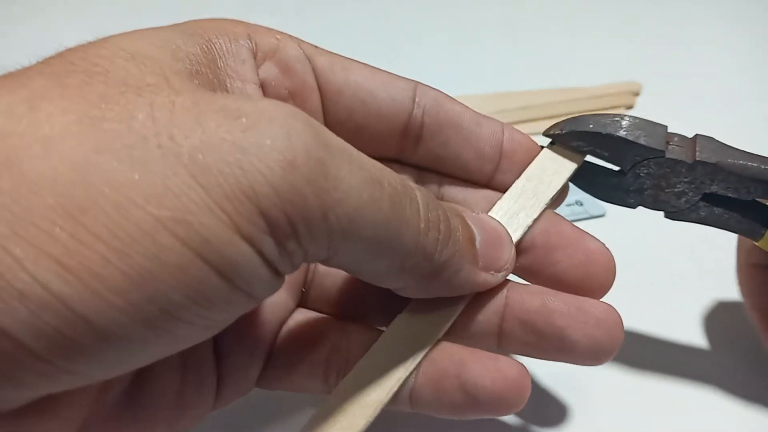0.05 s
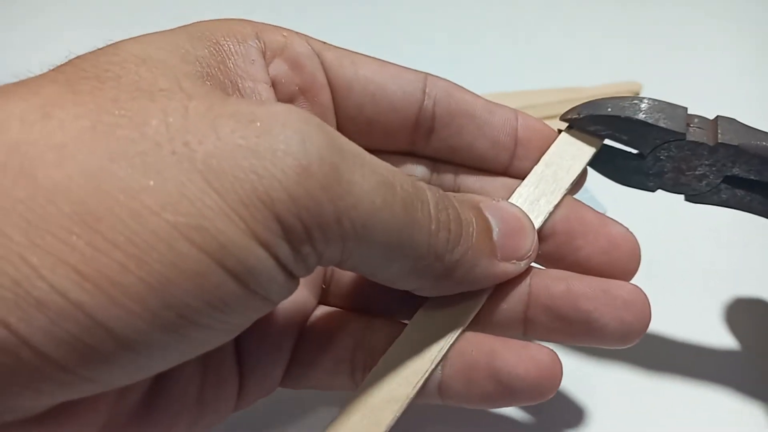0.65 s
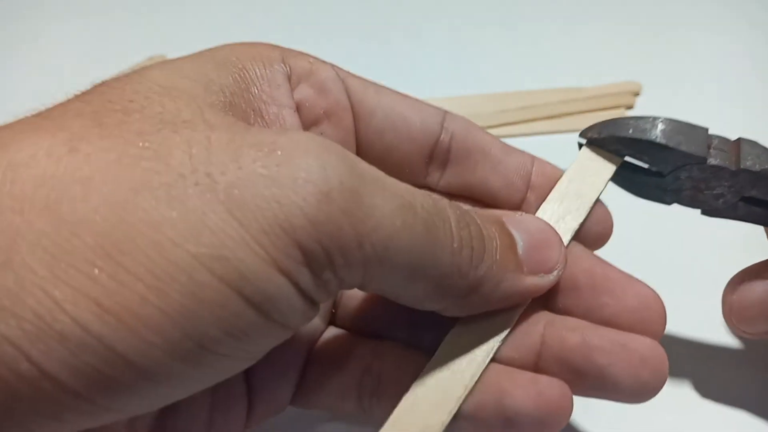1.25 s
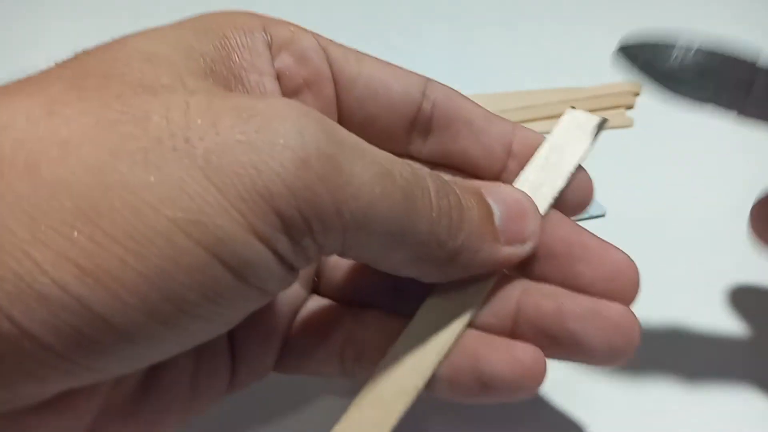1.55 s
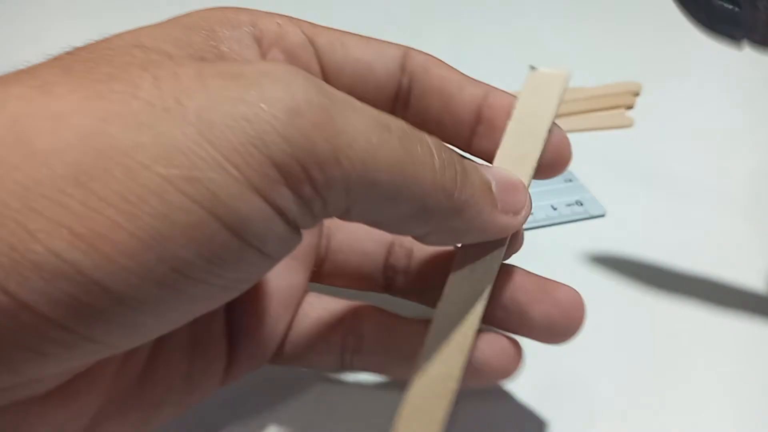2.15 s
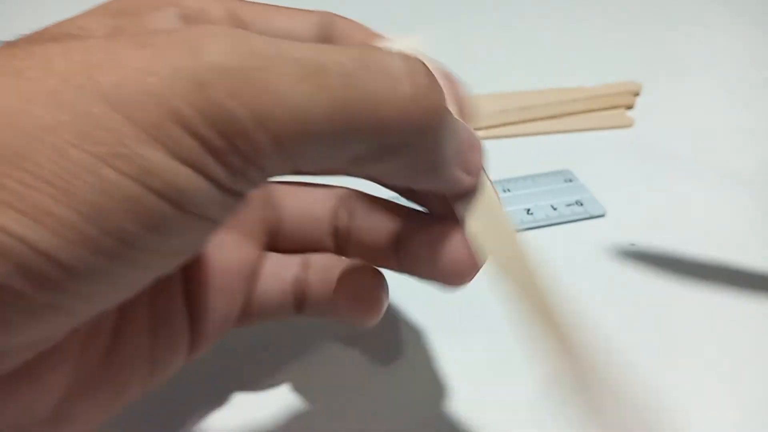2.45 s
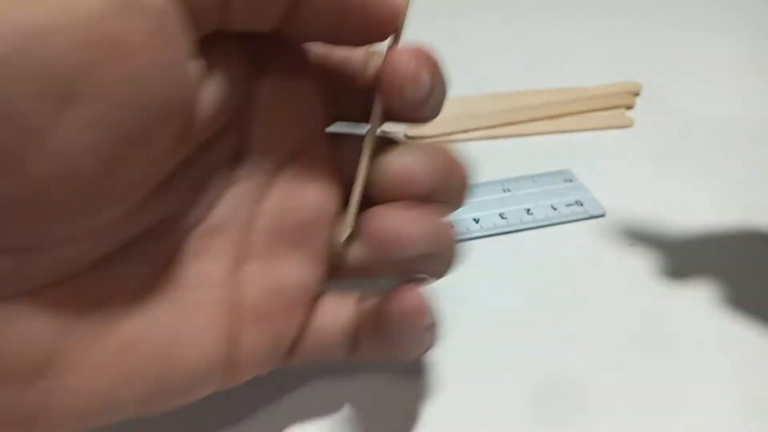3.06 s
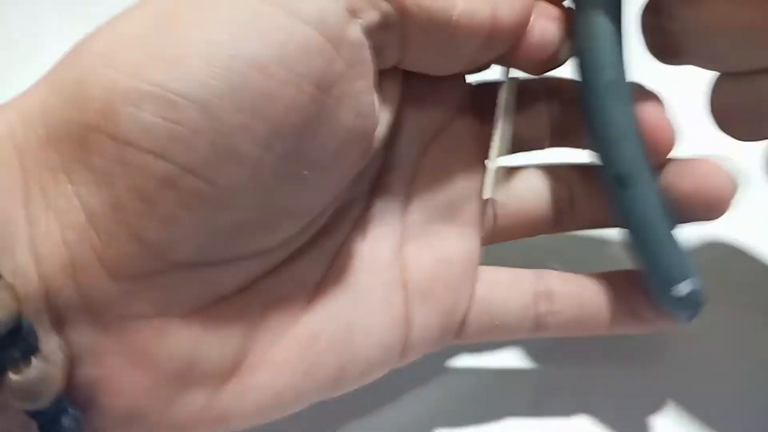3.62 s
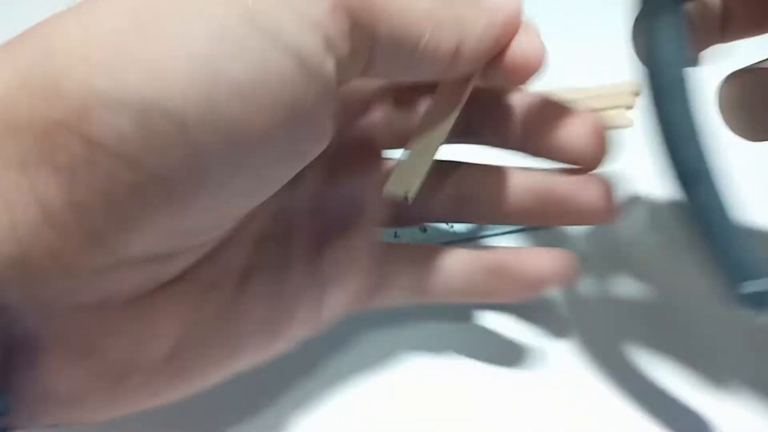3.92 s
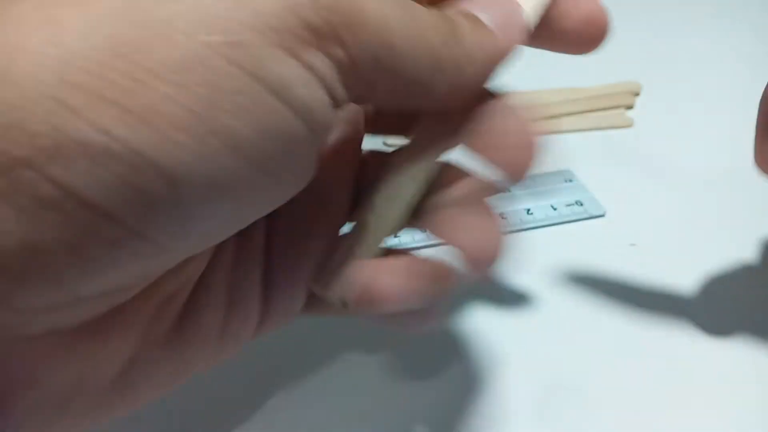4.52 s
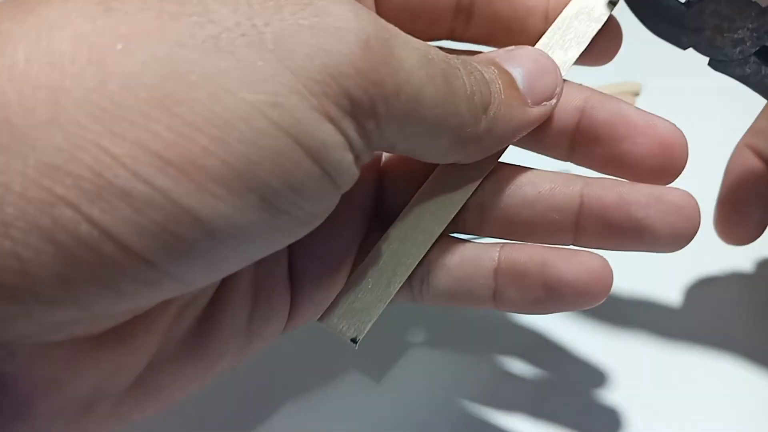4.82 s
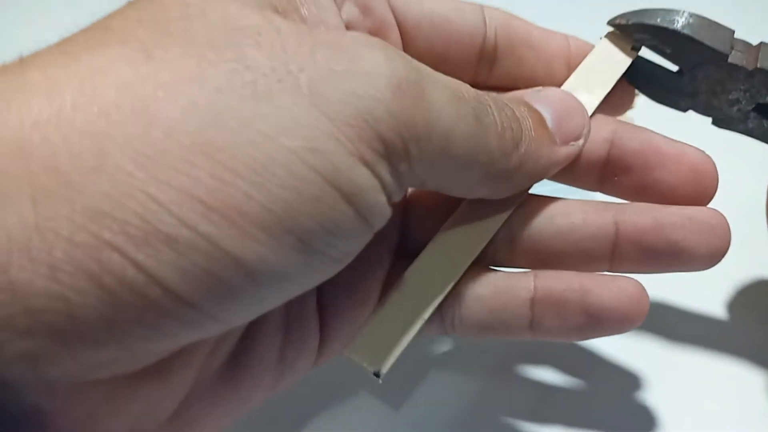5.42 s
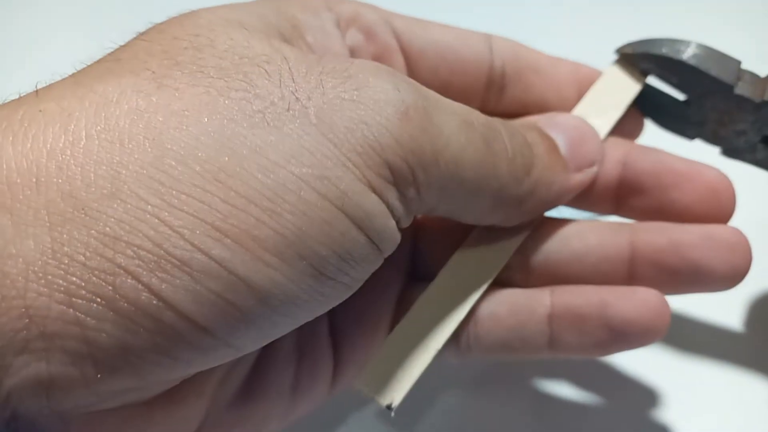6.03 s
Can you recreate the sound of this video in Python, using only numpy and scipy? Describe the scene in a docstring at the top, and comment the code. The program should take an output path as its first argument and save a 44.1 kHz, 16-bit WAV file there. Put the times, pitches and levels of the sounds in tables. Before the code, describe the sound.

Cutting pliers snip a wooden stick with one loud, sharp crack in a ringing room, followed by light clicks, while a distant dog yaps faintly.

```python
"""Cutting pliers bite through a wooden craft stick, close by, in a bare, ringing room.
An earlier crack's echo dies away; fibres crackle under the blades. At 1.19 s the wood cracks, the jaws
ring and a limiter ducks; the offcut bounces across the room until 2 s. From 2.5 s fingers turn the stick
and it ticks; the pliers knock at 3.44 s, then their joint squeaks.
Throughout: skin rubbing, a small dog yapping far away, room rumble and hiss."""
import sys
import numpy as np
from scipy import signal
from scipy.fft import rfft, irfft, next_fast_len
from scipy.io import wavfile
from scipy.ndimage import uniform_filter1d, minimum_filter1d, map_coordinates

SR = 44100
rng = np.random.default_rng(int(sys.argv[2]) if len(sys.argv) > 2 else 0)


def inscribe(sig):
    """Save sig as 16-bit PCM at rate SR to the path in sys.argv[1].

    A 1-D sig is mono; a 2-D sig holds one channel per row.
    Samples are clipped to [-1, 1] before scaling.
    """
    pcm = np.round(np.clip(np.atleast_2d(sig).T, -1, 1) * 32767)
    wavfile.write(sys.argv[1], SR, pcm.astype(np.int16))


N = 276948
T = np.arange(SR) / SR  # time axis of one event, 1 s
TOP_HZ = 15900

# snap of dry wood: (frequency [Hz], gain [dB])
SNAP_SPECTRUM = [(300, -1), (2400, 0.5), (3300, -7.5), (5000, 6.5), (8000, -5), (10000, -1), (12500, -8.5),
                 (15500, -4.5)]


def cut(room_db=-0.5):
    """Fibres tear within milliseconds; the steel jaws ring as they meet."""
    # (time [s], level [dB], tearing time [s]); the first leaves only its tail
    cracks = [(-.45, -6, 0.011), (1.1877, 2.3, 0.0036)]
    # breaking wood: (frequency [Hz], gain [dB])
    wood_spectrum = [(410, -51), (700, -16.5), (968, -21), (1240, -13.5), (1600, -4.5), (1900, -10),
                     (2160, -5.5), (3110, -21.5), (4130, -3), (5360, -11.5), (6500, -0.5), (8000, -16),
                     (9980, -14), (13100, -31.5), (15500, -18.5)]
    # (frequency [Hz], level [dB], t60 [s])
    jaw_modes = [(2110, -34.5, 0.049), (4040, -35.5, .12), (4270, -30.5, .12), (4250, -34.5, 0.19),
                 (5620, -35.5, .1), (5982, -35.5, .1), (6250, -36.5, .1), (6715, -32.5, .16)]
    ring = sum(amp(db) * fade(t60_s) * np.sin(2 * np.pi * hz * T) for hz, db, t60_s in jaw_modes)
    out = np.zeros((2, N))
    for s, db, tearing_s in cracks:
        crack = burst(swell(T, tearing_s), lambda hz: amp(along(wood_spectrum, hz)))
        add(out, s, amp(db) * in_room(crack + ring, room_db))
    return out


def offcut(t60_s=0.022, room_scale=0.96):
    """The chip lands far off, so its bright clacks are mostly room."""
    # (time [s], level [dB], room re direct [dB])
    bounces = [(-.25, -19, 10), (1.3135, -10, 2.5), (1.3251, -16.5, 10.5), (1.3355, -18.5, 11),
               (1.9004, -65, 15.5), (1.9905, -42.5, 11.5)]
    # (frequency [Hz], gain [dB])
    chip_spectrum = [(300, -23), (1500, -10), (2400, -7), (3200, -14.5), (4500, -9), (6000, 2), (8000, -11),
                     (9800, -2), (12000, -14), (15000, -7)]
    out = np.zeros((2, N))
    for s, db, room_db in bounces:
        clack = burst(fade(t60_s), lambda hz: amp(along(chip_spectrum, hz)))
        add(out, s, amp(db) * in_room(clack, room_db, room_scale))
    return out


def knock(t60_s=0.014, room_db=-13.5, room_scale=0.66):
    """The pliers knock in the hand: each contact is a dry snap plus the ring of the steel."""
    # touch, blow, two rebounds: (time [s], level [dB], snap [dB])
    contacts = [(3.4403, -27.5, -19), (3.4418, -14.5, -44), (3.4473, -33, -3), (3.4521, -33.5, -6)]
    # (frequency [Hz], width [Hz], gain [dB])
    steel_modes = [(2520, 160, -22), (3830, 360, -0.5), (5850, 700, -18), (9750, 450, -23.5),
                   (15300, 900, -38)]
    steel = lambda hz: sum(amp(db) * resonance(hz, centre, width) for centre, width, db in steel_modes)
    out = np.zeros((2, N))
    for s, db, snap_db in contacts:
        clack = burst(fade(t60_s), lambda hz: steel(hz) + amp(snap_db + along(SNAP_SPECTRUM, hz)))
        add(out, s, amp(db) * in_room(clack, room_db, room_scale))
    return out


def thumps(cut_s=1.1878, knock_s=3.4436, room_scale=0.93):
    """The cut jolts the stick, the knock the handles; each flexes for a few damped cycles."""
    # both: (frequency [Hz], level [dB], t60 [s], left-right [dB])
    stick_modes = [(1610, 2, .005, 17), (450.2, -9, .005, 2), (237.9, -12, .022, 3.5)]
    handle_modes = [(1210, -39, .022, 2.5), (535, -40.5, 0.041, 4.8), (80, -28.5, .08, 4.2),
                    (138, -30, .065, 1.9)]
    out = np.zeros((2, N))
    for s, modes, room_db in (cut_s, stick_modes, -10.5), (knock_s, handle_modes, -19.5):
        for hz, db, t60_s, pan_db in modes:
            phase = 2 * np.pi * hz * T
            flex = np.sin(phase) * fade(t60_s) * (1 - np.exp(-phase))
            velocity = np.gradient(flex, phase)  # pushes the air
            near = amp([[pan_db / 2], [-pan_db / 2]]) * direct(velocity)
            add(out, s, amp(db) * (near + amp(room_db) * reverb(velocity, room_scale)))
    return out


def stick_gain(hz, ring_hz, snap_db, width_ratio=0.15, overtone_ratio=2.1, overtone_db=-18):
    """A broad snap plus a ring and its overtone, pitched by where the fingers damp the stick."""
    ring = lambda f: resonance(f, ring_hz, width_ratio * ring_hz)
    snap = amp(snap_db + along(SNAP_SPECTRUM, hz))
    return ring(hz) + amp(overtone_db) * ring(hz / overtone_ratio) + snap


def ticks(t60_s=0.007, room_db=-11, room_scale=0.45):
    """Brief contacts with fingers and pliers set the stick ringing."""
    # (time [s], level [dB], ring [Hz], snap [dB])
    contacts = [(2.5568, -32.5, 4940, 1), (2.9284, -45.5, 4850, -34), (3.1827, -34.5, 5100, -28),
                (3.811, -47, 2770, -20.5), (4.6707, -40.5, 4700, -2), (4.7329, -42.5, 4660, -13)]
    out = np.zeros((2, N))
    for s, db, ring_hz, snap_db in contacts:
        tick = burst(fade(t60_s), lambda hz: stick_gain(hz, ring_hz, snap_db))
        add(out, s, amp(db) * in_room(tick, room_db, room_scale))
    return out


def squeaks(room_db=-15, room_scale=0.42, grit_db=-26, width_ratio=0.16, lead_s=0.2):
    """Dry contacts slip and sing, nearly pure: skin low on the wood, the pliers' joint high."""
    # (peak time [s], level [dB], pitch [Hz], half length [s])
    slips = [(.705, -44, 172.4, 0.059), (3.817, -63, 3586, 0.0089), (4.0732, -33, 5585, 0.0065),
             (5.208, -41, 5246, 0.0047)]
    out = np.zeros((2, N))
    for s, db, hz, half_s in slips:
        grit = unit_rms(filtered(rng.standard_normal(SR), lambda f: resonance(f, hz, width_ratio * hz)))
        tone = np.sin(2 * np.pi * hz * T) + amp(grit_db) * grit
        add(out, s - lead_s, amp(db) * in_room(swell(T - lead_s, half_s) * tone, room_db, room_scale))
    return out


def crush(t60_s=0.007, splinter_count=4, mean_gap_s=0.012, splinter_db=-13, room_db=-6, room_scale=0.6):
    """The blades sink in: each fibre that breaks takes a few more with it."""
    # (time [s], level [dB])
    breaks = [(.3545, -56), (.399, -53), (.4285, -48), (.741, -50), (.7475, -40.5), (.759, -47),
              (.803, -54), (.9284, -48.5), (.945, -50), (.9752, -54), (1.023, -55.5)]
    # (frequency [Hz], gain [dB])
    fibre_spectrum = [(1000, -16.5), (5000, -14), (7500, -13.5), (9500, -0.5), (12000, -8), (14000, -2.5),
                      (15500, 6.5)]
    out = np.zeros((2, N))
    for s, db in breaks:
        delays_s = np.cumsum(rng.exponential(mean_gap_s, size=splinter_count))
        splinters = sum(np.roll(fade(t60_s), round(delay * SR)) for delay in delays_s)
        envelope = fade(t60_s) + amp(splinter_db) * splinters
        crackle = burst(envelope, lambda hz: amp(along(fibre_spectrum, hz)) * (hz < TOP_HZ))
        add(out, s, amp(db) * in_room(crackle, room_db, room_scale))
    return out


def skin_friction(pitch_hz, peak_hz=167, diffuse_db=-6):
    """Dull noise of skin, its peak moved to pitch_hz; rms 1, largely alike on both sides."""
    # (frequency [Hz], gain [dB])
    skin_spectrum = [(24, -63.5), (40, -28.5), (167, -1.5), (200, -13), (291, -17.5), (501, -32.5),
                     (542, -40), (600, -36), (780, -67.5), (1320, -120)]
    noise = direct(rng.standard_normal(N)) + amp(diffuse_db) * rng.standard_normal((2, N))
    return unit_rms(filtered(noise, lambda hz: amp(along(skin_spectrum, hz * peak_hz / pitch_hz))))


def hands(gain_db=-1, hold_db=-73, hold_hz=167, sway_db=3, sways_per_s=6):
    """Skin shifts on stick and grips: swells of friction over a hold that is never quite still."""
    # (peak time [s], level before gain [dB], half length [s], pitch [Hz])
    rubs = [(.01, -51.5, .04, 165), (.05, -52, 0.045, 305), (.21, -59, 0.052, 160),
            (0.462, -49.5, 0.047, 160), (.72, -52.5, .07, 295), (.79, -54, 0.07, 155),
            (0.986, -56.5, 0.089, 165), (1.38, -46, .1, 255), (1.62, -50, 0.063, 165),
            (1.85, -62, .04, 165), (2.058, -62, 0.053, 260), (2.41, -54, .06, 160),
            (2.578, -53, 0.044, 160), (3.73, -60, .05, 160), (4.68, -57, .03, 335), (5.11, -64, .07, 165)]
    t = np.arange(N) / SR
    knots = rng.standard_normal(int(t[-1] * sways_per_s) + 2)
    sway = map_coordinates(knots, [t * sways_per_s], mode="nearest")
    hold = amp(hold_db + sway_db * sway) * skin_friction(hold_hz)
    shifts = sum(amp(db) * swell(t - s, half_s) * skin_friction(hz) for s, db, half_s, hz in rubs)
    return amp(gain_db) * (hold + shifts)


def slides(half_s=0.024, snap_db=-21, room_db=-6, room_scale=0.55, lead_s=0.1):
    """The stick slides through the fingers; friction excites its resonances."""
    # (peak time [s], level [dB], ring [Hz])
    strokes = [(.555, -70, 5700), (3.72, -63.5, 2900), (5.085, -69, 2510)]
    out = np.zeros((2, N))
    for s, db, ring_hz in strokes:
        scrape = unit_rms(filtered(rng.standard_normal(SR), lambda hz: stick_gain(hz, ring_hz, snap_db)))
        add(out, s - lead_s, amp(db) * in_room(scrape * swell(T - lead_s, half_s), room_db, room_scale))
    return out


def dog(jitter_ratio=0.055, third_db=-16, scoop_ratio=0.19, scoop_s=0.05, dulling_db=8):
    """Hoarse yaps scoop up to pitch and dull as the mouth closes; only their reverberation arrives."""
    # (time [s], target pitch [Hz], level [dB], length [s], octave [dB])
    yaps = [(.16, 815, -66, .11, -21), (1.008, 665, -58.5, 0.085, 0), (1.505, 672, -54.5, 0.083, -4),
            (1.876, 640, -54.5, .12, -4), (2.32, 650, -58, .16, -2.5), (3.29, 574.5, -70, .14, -14),
            (3.645, 700.4, -69.5, 0.13, 9), (4.175, 700, -68, .13, 5.5), (4.68, 776, -63.5, 0.063, 0)]
    out = np.zeros((2, N))
    for s, hz, db, length_s, octave_db in yaps:
        progress = np.clip(T / length_s, 0, 1)
        jitter = jitter_ratio * unit_rms(uniform_filter1d(rng.standard_normal(SR), size=130))
        pitch_hz = hz * (1 - scoop_ratio * np.exp(-T / scoop_s) + jitter)
        phase = 2 * np.pi * np.cumsum(pitch_hz) / SR
        mouth = amp(dulling_db * (0.5 - progress))
        overtones = amp(octave_db) * np.sin(2 * phase) + amp(third_db) * np.sin(3 * phase)
        voice = np.sin(phase) / mouth + mouth * overtones
        envelope = np.sqrt(np.abs(np.sin(np.pi * progress)))
        add(out, s, amp(db) * reverb(voice * envelope))
    return out


def air(rms_db=-63.5):
    """Steady room rumble and microphone hiss."""
    # (frequency [Hz], gain [dB])
    spectrum = [(15, -60.5), (25, -34), (70, -6.5), (92, -10), (123, 4.5), (190, -18.5), (301, -8),
                (363, -17), (575, -17), (677, -19.5), (818, -20.5), (1330, -23), (2760, -25), (13200, -44),
                (16000, -26)]
    # (frequency [Hz], left-right [dB])
    balance = [(60, 9.5), (110, 2.5), (200, -1), (380, 0), (700, 1.5), (1290, 2), (2380, 5), (4400, 4),
               (8120, -2.5), (15000, 6.5)]
    noise = rng.standard_normal((2, N))
    return amp(rms_db) * unit_rms(filtered(noise, lambda hz: amp(along(spectrum, hz)) * pan(balance, hz)))


def reverb(x, room_scale=1, build_s=0.016):
    """The diffuse room builds up, then dies treble first; room_scale multiplies its t60."""
    # (frequency [Hz], t60 [s])
    room_decay = [(150, 0.77), (1000, 0.73), (2000, 0.7), (4000, 0.71), (6500, 0.57), (9800, 0.39),
                  (12000, .34), (15000, .34)]
    hz, t, noise = signal.stft(rng.standard_normal((2, SR)), SR, nperseg=256)
    t60_s = room_scale * along(room_decay, hz)[:, None]
    tail = signal.istft(noise * np.exp(-np.log(1000) * t / t60_s), SR, nperseg=256)[1][:, :SR]
    tail *= 1 - np.exp(-T / build_s)
    return signal.fftconvolve(x[None], tail / np.linalg.norm(tail[1]), axes=1)[:, :SR]


def direct(x, lag_s=0.0011):
    """Sound reaches the right microphone first, then the left."""
    return np.array([np.roll(x, round(lag_s * SR)), x])


def in_room(x, room_db, room_scale=1):
    """Direct sound plus reverberation."""
    return direct(x) + amp(room_db) * reverb(x, room_scale)


def burst(envelope, gain, power_floor=0.067):
    """Tiny fractures ring through a body; the envelope sets their energy."""
    spectrum = rfft(envelope * rng.standard_normal(SR))
    power = np.abs(spectrum) ** 2
    whitening = 1 / np.sqrt(power / power.mean() + power_floor)  # sharp breaks are nearly flat
    y = irfft(spectrum * causal(whitening * gain(np.fft.rfftfreq(SR, 1 / SR))))
    return y * np.linalg.norm(envelope) / np.linalg.norm(y) / 2


def causal(gain):
    """Minimum-phase response: rings only after a blow."""
    cepstrum = irfft(np.log(np.maximum(gain, 1e-6)))
    half = cepstrum.shape[-1] // 2
    cepstrum[..., 1:half] *= 2
    cepstrum[..., half + 1:] = 0
    return np.exp(rfft(cepstrum))


def filtered(x, response):
    """x through response(hz)."""
    n = x.shape[-1]
    size = next_fast_len(n + SR // 4)
    return irfft(rfft(x, size) * response(np.fft.rfftfreq(size, 1 / SR)), size)[..., :n]


def resonance(hz, centre_hz, width_hz):
    """Gain of one steep-sided peak."""
    return 1 / (1 + ((hz - centre_hz) / width_hz) ** 2) ** 2


def pan(balance, hz):
    """Left and right gains, constant total power."""
    ratio = amp(along(balance, hz))
    return np.array([ratio, np.ones_like(ratio)]) / np.sqrt((1 + ratio ** 2) / 2)


def along(points, hz):
    """(Hz, value) points read on a log axis."""
    points_hz, values = np.transpose(points)
    return np.interp(np.log(hz + 1), np.log(points_hz + 1), values)


def fade(t60_s):
    """Exponential decay."""
    return np.exp(-np.log(1000) * T / t60_s)


def swell(t, half_s):
    """Gaussian envelope, peak at t = 0."""
    return np.exp(-(t / half_s) ** 2)


def amp(db):
    """Decibels to gain."""
    return 10 ** (np.asarray(db) / 20)


def unit_rms(x):
    """x at rms 1."""
    return x / np.sqrt(np.mean(x ** 2) + 1e-20)


def add(track, s, sound):
    """Mix a sound in at time s."""
    start = round(s * SR)
    part = sound[:, max(-start, 0):max(N - start, 0)]
    track[:, max(start, 0):][:, :part.shape[1]] += part


def scene(low_cut_hz=55):
    """All sources through two unlike microphones that shed deep bass, over rumble and hiss."""
    # the left one hears little treble: (frequency [Hz], left-right [dB])
    mic_balance = [(60, -0.5), (110, 6.5), (200, 3.5), (380, 1), (700, -3.5), (1290, -4.5), (2380, -8.5),
                   (4400, -20.5), (8120, -28.5), (15000, -5)]
    sources = cut() + offcut() + ticks() + slides() + knock() + crush() + squeaks() + thumps()
    sources += hands() + dog()
    low_cut = lambda hz: (hz / low_cut_hz) ** 2 / np.hypot(1, (hz / low_cut_hz) ** 2)
    return filtered(sources, lambda hz: causal(pan(mic_balance, hz) * low_cut(hz))) + air()


def record(dry, ceiling_db=0.1, release_db_per_s=68):
    """A limiter ducks at once and recovers at a steady rate; then the band limit."""
    peak_db = 20 * np.log10(np.abs(dry).max(axis=0) + 1e-9)
    over_db = np.maximum(peak_db - ceiling_db, 0)
    ramp_db = release_db_per_s * np.arange(N) / SR
    duck_db = np.maximum.accumulate(over_db + ramp_db) - ramp_db
    gain_db = uniform_filter1d(minimum_filter1d(-duck_db, size=129), size=65)
    return filtered(dry * amp(gain_db), lambda hz: hz < TOP_HZ)


dry = scene()
out = record(dry)
inscribe(out)
```